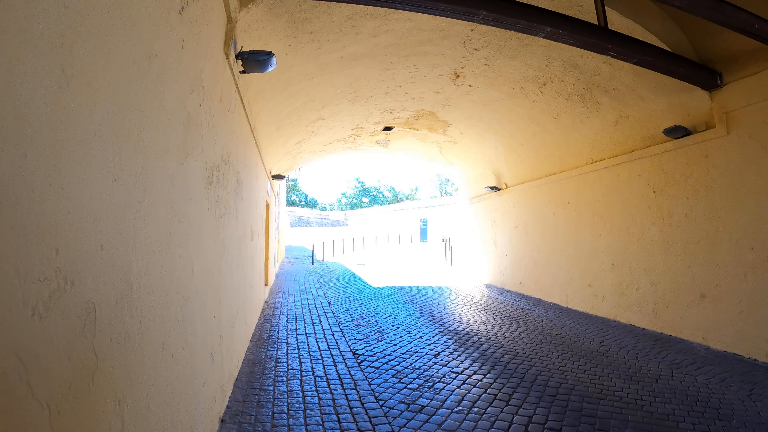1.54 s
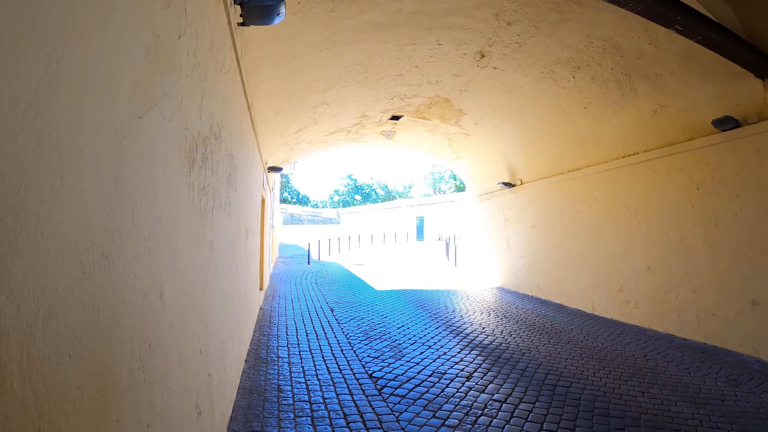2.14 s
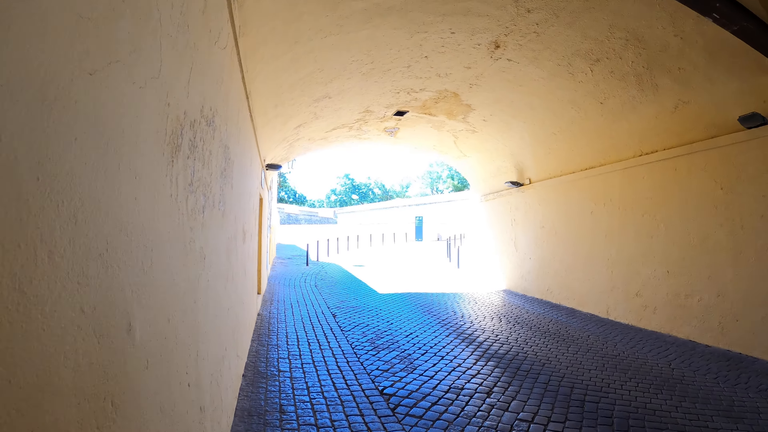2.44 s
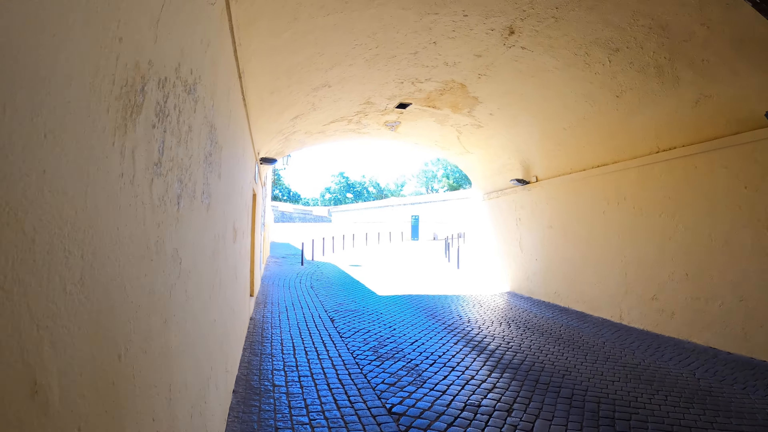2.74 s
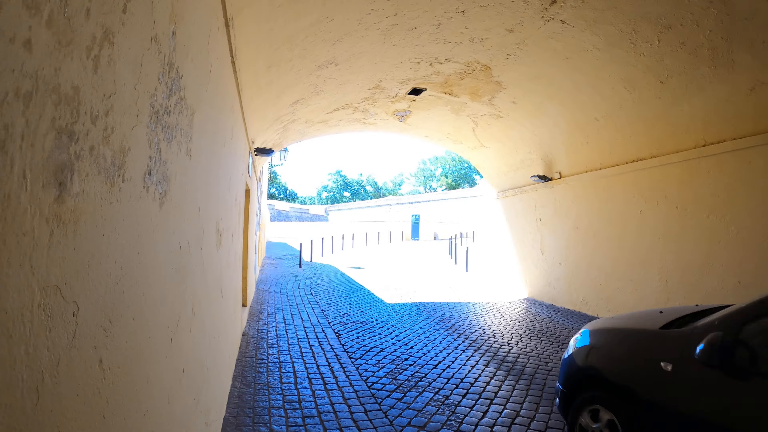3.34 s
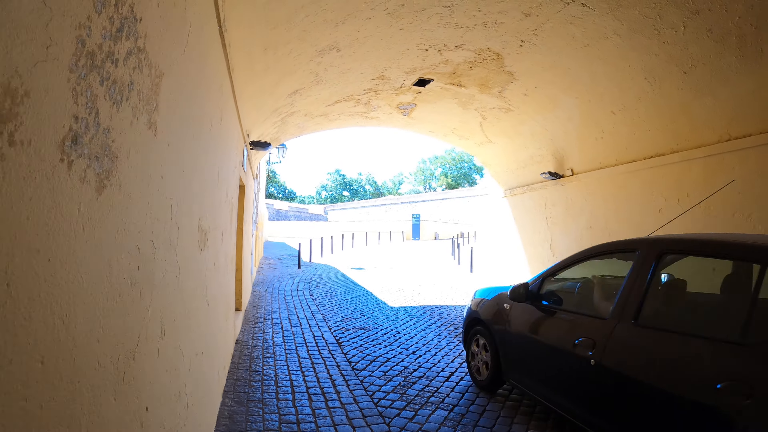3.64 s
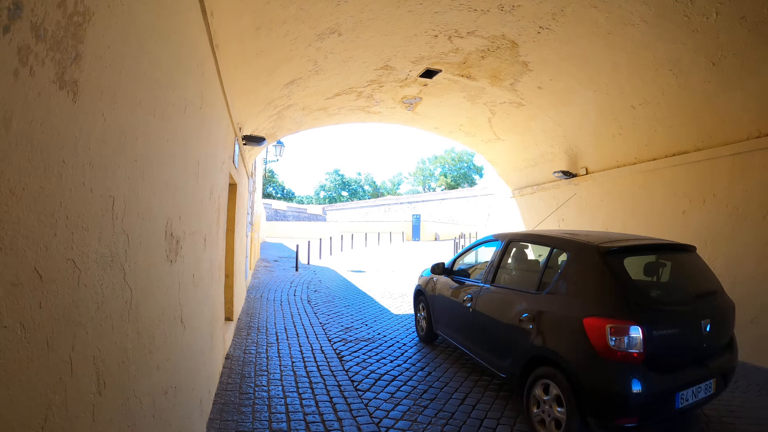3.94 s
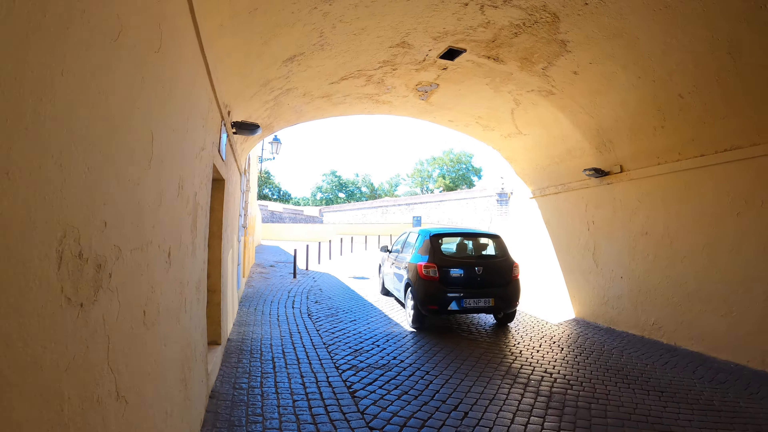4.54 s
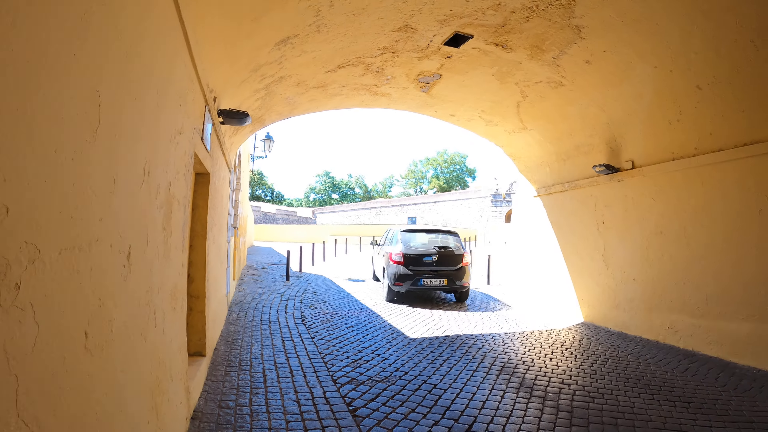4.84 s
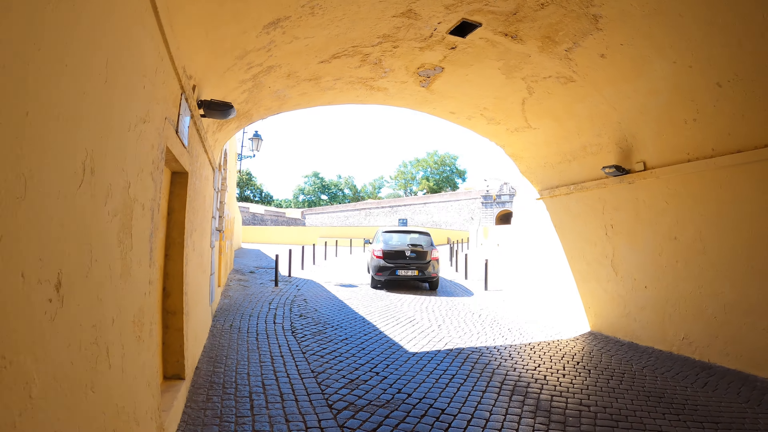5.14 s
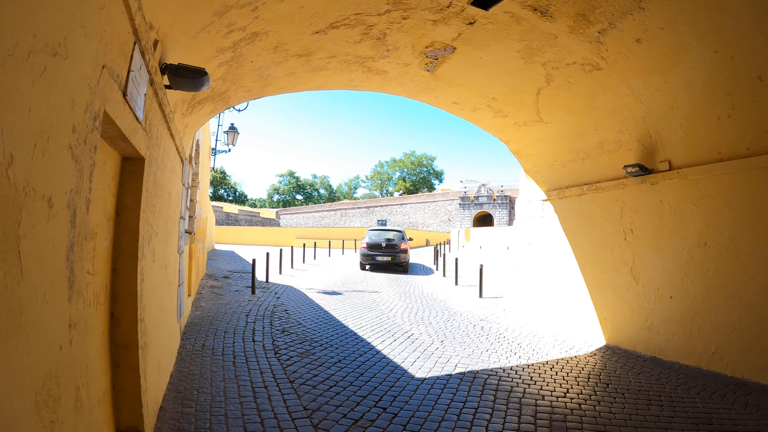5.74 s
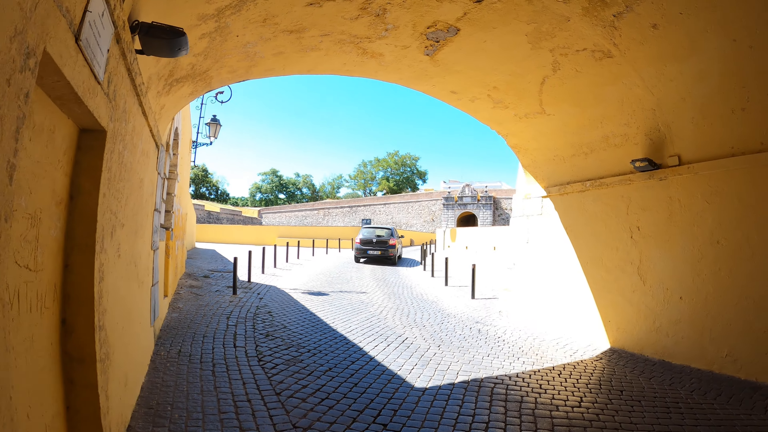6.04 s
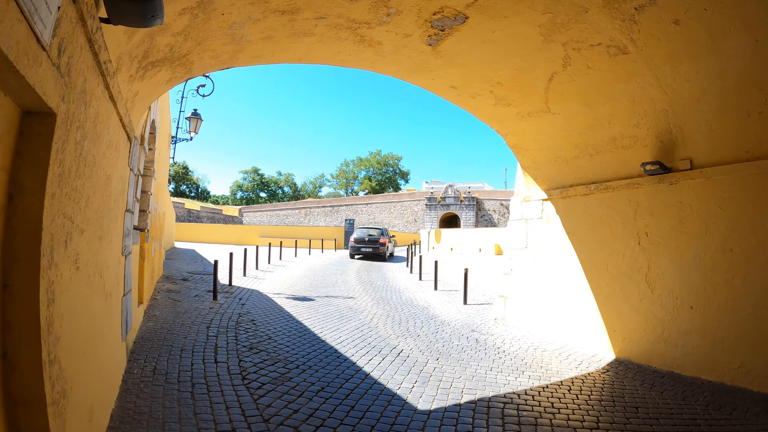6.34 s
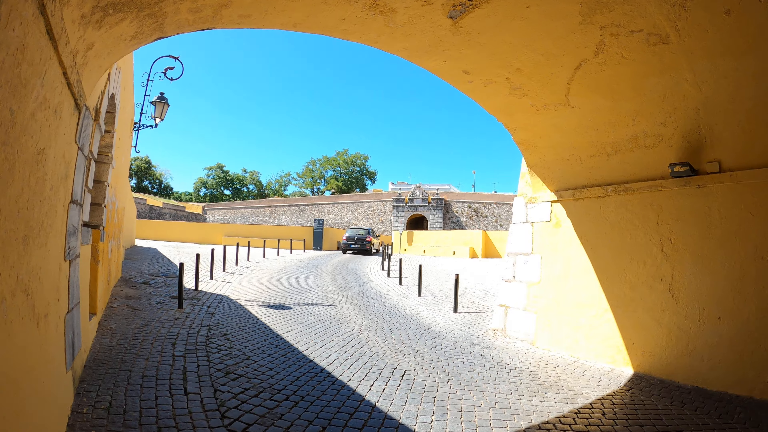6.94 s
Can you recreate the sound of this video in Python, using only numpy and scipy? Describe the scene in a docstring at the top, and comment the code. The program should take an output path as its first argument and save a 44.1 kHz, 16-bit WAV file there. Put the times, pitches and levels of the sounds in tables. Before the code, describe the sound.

A small car approaches inside a vaulted, cobbled gateway. Its exhaust throbs and drones from the start, with a dab of throttle just before 1 second, while the tyres patter and hiss over the stones, growing louder. Around 2 seconds a tyre squeals briefly, grit cracks under a nearby shoe, and a low draught starts buffeting the microphone. From 2 to about 5 seconds the car is at its loudest, passing on the right with dull knocks on raised stones and brief hums, and the vault booms deeply, most of all around 3.5 seconds. After 5 seconds the boom dies away and the tyre noise eases as the car reaches the open. The engine keeps pulling, slowly rising in pitch, with a hollow exhaust rush near 7 seconds. Close shoes crunch on grit around 5.6 seconds and again at 6.7, with a soft heel strike.

```python
"""In a vaulted, cobbled town gate, a small car comes from behind, passes on the right and pulls away.
Its tyres patter over the joints between the stones, knock on raised ones and squeal once.
Its three-cylinder engine drones through the exhaust, and the vault booms until the car is in the open.
Close by, a walker's shoes crunch on grit and a draught buffets the microphone."""
import sys
import numpy as np
from scipy import signal
from scipy.fft import rfft, irfft, next_fast_len
from scipy.io import wavfile
from scipy.ndimage import uniform_filter1d

SR = 44100
rng = np.random.default_rng(int(sys.argv[2]) if len(sys.argv) > 2 else 0)


def wrap_up_sound(samples):
    """Save the sound to the file named by the first command line argument, as 16-bit audio."""
    columns = np.atleast_2d(samples).T
    # keep every value between -1 and 1, then stretch to whole-number steps
    tamed = np.clip(columns, -1, 1)
    steps = np.round(tamed * 32767).astype(np.int16)
    wavfile.write(sys.argv[1], SR, steps)


N = 312669


def from_db(db):
    """Turn decibels into a number to multiply by."""
    return 10 ** (np.asarray(db) / 20)


def rms_one(x):
    """Scale a sound so that its average strength (rms) is 1."""
    return x / np.sqrt(np.mean(x ** 2) + 1e-20)


def in_time(rows):
    """Join a table's points with straight lines: one curve for each column after the time."""
    times, *columns = np.transpose(rows)
    return [np.interp(np.arange(N) / SR, times, column) for column in columns]


def at_hz(points, hz, beyond=None):
    """Look up a table by frequency, on a scale of octaves."""
    f, value = np.transpose(points)
    return np.interp(np.log(hz + 1e-3), np.log(f), value, beyond, beyond)


def drift(rate):
    """A random wobble, about 1 in size, that finds a new value `rate` times a second."""
    knots = rng.standard_normal(8000)
    return rms_one(np.interp(np.arange(N) / SR * rate, np.arange(len(knots)), knots))


def ramp(start_s, end_s):
    """Rise from 0 to 1 between two times."""
    return np.clip((np.arange(N) / SR - start_s) / (end_s - start_s), 0, 1)


def swell(at_s, lasts_s):
    """A smooth bump of height 1."""
    return np.exp(-((np.arange(N) / SR - at_s) / lasts_s) ** 2)


def pan(db):
    """Gains for the two ears, with the left `db` louder than the right."""
    return from_db(np.array([[.5], [-.5]]) * db)


# How much louder the left ear is: f/Hz, left-right/dB
EAR_BALANCE = [(150, 0), (400, 0), (650, 1.4), (1600, 2), (2600, 4), (4200, 1.5), (7000, -1)]
# How wide each frequency sounds (side against middle): f/Hz, width/dB
STEREO_WIDTH = [(60, -33), (150, -46), (250, -20.5), (500, -16.5), (1000, -10.5), (2000, -8.5), (4000, -5),
                (8000, 0)]
# The car's path: t/s, share out of the gate/0-1, extra width/dB
CAR_PATH = [(0, 0.09, -7), (1.8, 0, -0.5), (2.8, 0.19, 1.5), (3.6, 0.14, 2), (4.7, 0.14, 0.5),
            (5.05, 1, -0.5), (7.09, 0.94, 0)]
def stereo_noise(spectrum):
    """Noise of a given colour, alike in both ears in the bass, widest while the car is alongside."""
    size = next_fast_len(N, real=True)
    hz = np.arange(size // 2 + 1) * SR / size
    mid, side = rfft(rng.standard_normal((2, size))) * from_db(at_hz(spectrum, hz, -120))
    centre = irfft(mid * pan(at_hz(EAR_BALANCE, hz)), size)[:, :N]
    wide = irfft(side * from_db(at_hz(STEREO_WIDTH, hz)), size)[:N] * from_db(in_time(CAR_PATH)[1])
    return (centre + wide * [[1], [-1]]) / np.std(centre.mean(axis=0))


def narrow_noise(hz, width_hz, wander):
    """A narrow band of noise that sounds like a wavering note."""
    phase = 2 * np.pi * np.cumsum(hz * (1 + wander * drift(6))) / SR
    band = drift(width_hz) * np.cos(phase) + drift(width_hz) * np.sin(phase)
    return band * pan(at_hz(EAR_BALANCE, hz))


def bursts(rows, decay_s):
    """Each time two things touch, they make a dying burst of noise around one pitch."""
    out = np.zeros((2, N + SR))
    t = np.arange(SR // 4) / SR
    shape = np.exp(-t / decay_s) * np.minimum(t / .0005, 1) + 1e-18
    for start_s, db, hz, octaves, pan_db in rows:
        mid, side = rng.standard_normal((2, len(t))) * shape
        noise = mid + side * [[1], [-1]] * from_db(at_hz(STEREO_WIDTH, hz))
        edges_hz = [hz * 2 ** (-octaves / 2), min(hz * 2 ** (octaves / 2), .45 * SR)]
        band = signal.butter(2, edges_hz, "band", fs=SR, output="sos")
        burst = rms_one(signal.sosfilt(band, noise)) * np.sqrt(np.mean(shape ** 2))
        at = int(start_s * SR)
        out[:, at:at + len(t)] += from_db(db) * pan(pan_db) * burst
    return out[:, :N]


def patter(knocks, decay_s, smooth_share):
    """A loudness curve: soft rubber rounds off each knock, and walls smear a share into a steady wash."""
    energy = signal.lfilter([1], [1, -np.exp(-2 / (decay_s * SR))], knocks ** 2 + 1e-18)
    energy = uniform_filter1d(uniform_filter1d(energy, size=48), size=48)
    return np.sqrt(smooth_share + (1 - smooth_share) * energy / energy.mean())


def microphone_hiss(level_db):
    """The microphone adds a faint, even hiss of its own."""
    return from_db(level_db) * rng.standard_normal((2, N))


# The low rumble of moving air: f/Hz, level/dB
WIND_COLOUR = [(12, -9), (30, 0), (60, -3), (100, -10), (180, -23), (400, -50)]
def draught(still_db, walking_db, gust_db):
    """Swirls of air buffet each side of the microphone separately, harder once the walk begins."""
    hz = np.arange(N // 2 + 1) * SR / N
    swirls = irfft(rfft(rng.standard_normal((2, N))) * from_db(at_hz(WIND_COLOUR, hz, -120)), N)
    puff_db = 3 * swell(at_s=6.8, lasts_s=.096)
    level_db = still_db + (walking_db - still_db) * ramp(1.8, 3.6) + puff_db
    return from_db(level_db) * rms_one(from_db(gust_db * drift(9)) * swirls)


def vault_echo(x, cutoff_hz, fade_s=.6):
    """Plastered walls send back a dense, dull echo that falls 60 dB in `fade_s`."""
    t = np.arange(SR) / SR
    tail = rng.standard_normal((2, SR)) * from_db(-60 * t / fade_s) * np.minimum(t / .017, 1)
    tail = signal.sosfilt(signal.butter(2, cutoff_hz, fs=SR, output="sos"), tail)
    return signal.fftconvolve(x, rms_one(tail) / np.sqrt(SR), axes=1)[:, :N]


# Grit cracks, soles scuff, a heel lands. All three: t/s, level/dB, f/Hz, band/octaves, left-right/dB
GRIT_CRACKS = [(2.189, -26.5, 3100, .9, 2), (3.195, -46, 5800, .75, 0), (5.6041, -24.5, 3000, .55, 3),
               (5.746, -54, 7600, .8, 0), (5.931, -53, 8600, .4, 0), (6.0045, -43.5, 6200, .7, 0),
               (6.727, -24.5, 3200, .8, 3), (6.7325, -36, 4100, 1.1, 1), (6.7442, -29, 3900, 1.1, -1),
               (6.7488, -32, 3500, 1, 2), (6.758, -36, 5100, 0.45, 1), (6.774, -32, 2100, .5, 0),
               (6.792, -42, 4000, .8, 0)]
SOLE_SCUFFS = [(.005, -55.5, 4170, 0.76, 0), (3.425, -50, 5600, 0.7, 0), (6.745, -54, 4500, .9, 0)]
HEEL_STRIKE = [(6.79, -27, 600, 1.5, 0), (6.793, -23, 265, .6, 0)]
def footsteps(echo_db):
    """The soles are soft, so you mostly hear grains cracking and scraping between shoe and stone."""
    steps = bursts(GRIT_CRACKS, decay_s=.0021)
    steps += bursts(SOLE_SCUFFS, decay_s=.033)
    steps += bursts(HEEL_STRIKE, decay_s=.0066)
    return steps + from_db(echo_db) * vault_echo(steps, cutoff_hz=9000)


# The crunch of grit under a shoe: f/Hz, level/dB
CRUNCH_COLOUR = [(1800, -3), (2800, 3), (3800, 1.5), (5000, -10.5), (7000, -15), (10000, -27.5),
                 (14000, -39)]
def sole_grinding(level_db, grains_per_s, spread_db):
    """A sole rolls over loose grit and crushes a run of tiny grains."""
    crushed = rng.random(N) < grains_per_s / SR
    grains = crushed * from_db(spread_db * np.clip(rng.standard_normal(N), -2, 2))
    crunch = stereo_noise(CRUNCH_COLOUR) * patter(grains, decay_s=.003, smooth_share=.4)
    return from_db(level_db) * swell(at_s=5.82, lasts_s=.39) * crunch


# The vault's deep note: f/Hz, level/dB
BOOM_COLOUR = [(15, -28), (24, -11), (29, -5), (33, 3), (37, -7), (44, -10), (52, -21), (110, -50)]
# Its loudness, greatest while the car is just ahead: t/s, level/dB
BOOM_LEVEL = [(0, -42.5), (1.05, -35), (1.15, -25.5), (1.35, -38), (1.65, -33), (2, -25), (2.15, -28),
              (2.38, -29), (2.47, -21), (2.72, -25), (2.85, -20), (3.02, -19), (3.11, -35), (3.2, -21.5),
              (3.57, -15.5), (3.85, -21), (4.12, -21.5), (4.4, -26), (4.82, -24), (5.3, -41), (7.09, -39)]
def vault_boom():
    """The vault's lowest resonance heaves as the car goes through and dies away as it leaves."""
    boom = stereo_noise(BOOM_COLOUR)
    loudness = np.abs(signal.hilbert(boom.mean(axis=0), next_fast_len(N)))[:N]
    evened = boom / np.hypot(loudness, .5)
    return from_db(in_time(BOOM_LEVEL)[0]) * rms_one(evened)


# Brief booms, hums and rings: t/s, length/s, f/Hz, band/Hz, level/dB
NARROW_SWELLS = [(.8, .22, 800, 45, -47), (.95, .25, 470, 90, -46), (1.28, .15, 330, 80, -43),
                 (2.12, .09, 880, 150, -36), (2.15, .08, 172, 30, -30), (2.34, .04, 940, 180, -37),
                 (2.5, .05, 172, 20, -29), (2.88, .09, 146, 20, -32), (2.92, .14, 83, 8, -29),
                 (3.33, .15, 600, 170, -36), (3.5, .15, 40, 4, -22), (4.12, .05, 970, 190, -35),
                 (4.58, .045, 1010, 180, -31.5), (4.72, .07, 1050, 280, -30.5), (4.8, .14, 43, 4, -20),
                 (4.92, .08, 190, 15, -32), (5.2, .09, 1075, 130, -35.5), (5.73, .09, 950, 150, -37)]
def narrow_swells():
    """Brief booms, hums and rings swell and fade in narrow bands as the car passes."""
    out = np.zeros((2, N))
    for at_s, lasts_s, hz, width_hz, db in NARROW_SWELLS:
        bump = swell(at_s, lasts_s)
        band = narrow_noise(hz, width_hz, wander=.01)
        band_rms = np.sqrt(np.average(band.mean(axis=0) ** 2, weights=bump ** 2))
        out += from_db(db) * bump * band / band_rms
    return out


def bonnet_whistle(start_s, end_s, low_hz, high_hz, level_db):
    """A faint, airy whistle from under the bonnet climbs as the car goes by."""
    peak = ((start_s + end_s) / 2, (low_hz + high_hz) / 2, 1)
    hz, power = in_time([(start_s, low_hz, 0), peak, (end_s, high_hz, 0)])
    phase = 2 * np.pi * np.cumsum(hz * (1 + .006 * drift(40))) / SR
    return from_db(level_db) * np.sqrt(power) * drift(500) * np.sin(phase)


# Gas rushing through the muffler: t/s, level/dB
RUSH_LEVEL = [(0, -45), (1.5, -41), (6.0, -48.5), (6.35, -41), (6.7, -41), (6.85, -36), (7.09, -33.5)]
def muffler_rush(hz, width_hz):
    """A hollow rush of gas at the muffler's resonance, loudest as the car pulls away."""
    band = signal.butter(2, [hz - width_hz / 2, hz + width_hz / 2], "band", fs=SR, output="sos")
    return from_db(in_time(RUSH_LEVEL)[0]) * rms_one(signal.sosfilt(band, rng.standard_normal(N)))


# A dab of throttle, then a steady pull: t/s, firing rate/Hz
ENGINE_SPEED = [(0.25, 32), (0.62, 36.9), (0.82, 36.5), (1.3, 31.6), (1.75, 32.3), (2.4, 34.8),
                (2.78, 35.8), (3.02, 37.6), (3.2, 37.8), (3.45, 40.2), (4.0, 43), (4.6, 46.5), (5.4, 48.8),
                (6.0, 49.9), (6.35, 50.9), (6.6, 53.2), (7.09, 55.2)]
def firing_rate():
    """How many times a second the engine fires, moment by moment."""
    return in_time(ENGINE_SPEED)[0]


# The throb at the firing rate and the drone of the overtones above it. Both: t/s, level/dB
THROB_LEVEL = [(0, -34), (.6, -31), (.83, -23), (1.03, -34), (1.6, -32), (2.5, -24), (3.1, -30), (3.8, -27),
               (4.1, -22), (4.35, -29), (5.1, -20), (5.19, -27), (5.27, -18), (5.37, -34), (5.45, -20.5),
               (5.57, -26), (5.7, -20.5), (5.82, -20.5), (6.13, -16.5), (6.28, -25), (6.36, -22.5),
               (6.54, -28), (6.72, -23), (6.98, -33), (7.09, -24)]
DRONE_LEVEL = [(0, -49), (.4, -31), (.58, -30), (.85, -24), (1.02, -25.5), (1.15, -35), (1.65, -32),
               (1.9, -23.5), (2.3, -20.5), (2.55, -18), (2.7, -19), (2.8, -22), (2.92, -18.5), (3.35, -25),
               (3.8, -30), (4.0, -21), (4.35, -31), (4.7, -23.5), (5.0, -19.5), (5.28, -20.5), (5.5, -38),
               (5.62, -30), (5.7, -35), (5.95, -25.5), (6.2, -26.5), (6.45, -34), (6.75, -25), (7.0, -34)]
# The overtones, as multiples of the firing rate, and the strength of each: level/dB
OVERTONES = [2, 5 / 2, 3, 4, 5]
OVERTONE_DB = [0.5, -11, 0, -2, -6.5]
# Pitches that muffler and vault favour or weaken: f/Hz, level/dB
RESONANCES = [(62, -12), (69, -8), (76, -11), (86, -0.5), (97, 1.5), (107, -0.5), (120, -6), (132, -23),
              (178, -16), (210, -18.5), (250, -17.5), (330, -24)]
def exhaust(firing_hz, drone_rough, throb_rough):
    """The firings throb; their overtones swell and fade as they cross the resonances."""
    phase = 2 * np.pi * np.cumsum(firing_hz) / SR
    throb = from_db(in_time(THROB_LEVEL)[0]) * np.cos(phase + throb_rough * drift(16))
    throb *= 1 + throb_rough * drift(20)
    drone_db = in_time(DRONE_LEVEL)[0]
    drone = np.zeros(N)
    for multiple, db in zip(OVERTONES, OVERTONE_DB):
        gain = from_db(drone_db + db + at_hz(RESONANCES, multiple * firing_hz))
        tone = np.cos(multiple * phase + drone_rough * drift(13))
        drone += gain * tone * (1 + drone_rough * drift(18))
    return throb + drone


# One short squeal: t/s, f/Hz, level/dB
SQUEAL_NOTE = [(1.87, 1790, -100), (1.885, 1800, -38.5), (1.92, 1860, -34), (1.95, 1920, -45),
               (2.02, 1890, -40), (2.06, 1880, -56), (2.1, 1880, -100)]
def tyre_squeal(wander):
    """Rubber slips on polished stone: a shaky note that slides up and fades."""
    hz, db = in_time(SQUEAL_NOTE)
    phase = 2 * np.pi * np.cumsum(hz * (1 + wander * drift(300))) / SR
    return from_db(db) * (1 + drift(120) / 2) * np.sin(phase) * pan(at_hz(EAR_BALANCE, hz))


# Stones that stick up: t/s, level/dB, f/Hz, band/octaves, left-right/dB
RAISED_STONES = [(2.108, -22.5, 180, .8, 0), (2.497, -23.5, 170, .8, 0), (2.648, -24.5, 160, .8, 0),
                 (2.812, -24.5, 160, .8, 0), (2.893, -22.5, 155, .8, 0), (3.768, -21.5, 185, .9, 0),
                 (3.878, -26, 1100, 1.2, 1), (3.93, -24, 380, .6, 0), (4.12, -24, 185, .9, 0),
                 (4.395, -22.5, 200, 1.1, 0), (5.356, -23.5, 960, .35, 1), (5.366, -26, 380, .7, 0)]
def wheel_knocks():
    """A wheel gives a short knock when it hits a raised stone."""
    return bursts(RAISED_STONES, decay_s=.008)


# Echoes from the nearby walls and ceiling: delay/s, level/dB
WALL_ECHOES = [(.004, -30.5), (.0065, -22), (.0087, -17.5), (0.0131, -37)]
def near_walls(x, path_change):
    """Quick echoes colour the sound; their paths change as the car and the listener move."""
    samples = np.arange(N)
    out, power = x.copy(), 1
    for delay_s, db in WALL_ECHOES:
        earlier = samples - delay_s * SR * (1 + path_change * drift(.8))
        out += from_db(db) * np.array([np.interp(earlier, samples, ear) for ear in x])
        power += from_db(db) ** 2
    return out / np.sqrt(power)


def stone_joints(stones_per_s, uneven, spread_db):
    """Four wheels each drop into one joint after another; the stones differ in length and height."""
    stones_passed = np.cumsum(stones_per_s) / SR
    knocks = np.zeros(N)
    for wheel in rng.standard_normal((4, 800, 2)):
        lengths = np.exp(uneven * wheel[:, 0])
        at = np.searchsorted(stones_passed, np.cumsum(lengths))
        knocks[at[at < N]] += from_db(spread_db * np.minimum(wheel[at < N, 1], 2))
    return knocks


# Colours of the tyre's body, its tread (in and out of the gate) and the grit. All: f/Hz, level/dB
BODY_THUD = [(35, -29), (60, 5), (82, 0), (125, -1), (175, -4), (215, -10), (255, -9), (330, -16),
             (400, -16), (520, -36)]
TREAD_INSIDE = [(280, -47), (390, -0.5), (480, 3.5), (580, 1), (700, 2), (820, 2), (960, 2), (1150, -1),
                (1400, -6.5), (1750, -33)]
TREAD_OUTSIDE = [(280, -1.5), (390, -2.5), (470, -2), (570, -3), (720, -3), (840, -3), (950, 2), (1090, -3),
                 (1230, -2.5), (1400, -12.5), (1750, -18)]
GRIT_HISS = [(1100, -7.5), (1450, 1.5), (1700, -0.5), (1950, 0.5), (2400, -5), (2750, -5.5), (3200, -9.5),
             (3750, -9.5), (4400, -16), (5500, -27.5)]
GRIT_SIZZLE = [(3800, -4), (4900, -2), (5500, 1.5), (6200, -1), (7200, -3), (8100, -9.5), (9300, -8.5),
               (10300, -15.5), (12500, -23), (15000, -32)]
# The tyres come near, pass and leave: t/s, roar level/dB, thud level/dB
TYRE_LEVELS = [(0.25, -46, -35), (.9, -40.5, -31.5), (1.6, -36, -27.5), (2.12, -32, -23), (3, -32.5, -28),
               (3.35, -31, -26.5), (4.42, -30.5, -26), (4.58, -29.5, -24), (4.8, -29, -25),
               (5.15, -33, -29.5), (6.3, -35.5, -29.5), (7.09, -37, -29)]
# The tread's ring climbs as the car gathers speed: t/s, f/Hz, level against the roar/dB
RING_NOTE = [(.8, 788, -29), (2.2, 895, -10), (3.8, 991, -10), (4.7, 1055, -14), (5.4, 1025, -12.5),
             (7.09, 1001, -7)]
def tyres(firing_hz, stones_per_firing, left_lag_s):
    """Rolling over the joints thumps the tyre's body, slaps its tread and crushes grit."""
    knocks = stone_joints(stones_per_firing * firing_hz, uneven=.2, spread_db=2.5)
    outside = in_time(CAR_PATH)[0]
    roar_db, thud_db = in_time(TYRE_LEVELS)
    hiss_db = -11.5 + .84 * roar_db - 4 * outside  # follows the roar, softer in the open
    ring_hz, ring_db = in_time(RING_NOTE)
    tread = np.sqrt(1 - outside) * stereo_noise(TREAD_INSIDE)
    tread += np.sqrt(outside) * stereo_noise(TREAD_OUTSIDE)
    tread += from_db(ring_db) * narrow_noise(ring_hz, width_hz=150, wander=.035)
    grit = stereo_noise(GRIT_HISS) + from_db(-18.5 - 2.3 * outside) * stereo_noise(GRIT_SIZZLE)
    thud = from_db(thud_db) * stereo_noise(BODY_THUD) * patter(knocks, decay_s=.012, smooth_share=.8)
    roar = from_db(roar_db) * tread * patter(knocks, decay_s=.0064, smooth_share=.76)
    hiss = from_db(hiss_db) * grit * patter(knocks, decay_s=.0093, smooth_share=.59)
    left, right = near_walls(thud + roar + hiss, path_change=.0582)
    # the car is on the right, so its sound reaches the left ear later
    return np.array([np.roll(left, round(left_lag_s * SR)), right])


def scene():
    """Add up the car, the walker, the vault and the background."""
    firing_hz = firing_rate()
    car = tyres(firing_hz, stones_per_firing=1.5, left_lag_s=2.8e-5)
    swells = narrow_swells()
    car += wheel_knocks() + tyre_squeal(wander=.023)
    car += exhaust(firing_hz, drone_rough=.1, throb_rough=.16) + muffler_rush(hz=283.5, width_hz=92)
    car += bonnet_whistle(start_s=3.3, end_s=4.1, low_hz=10200, high_hz=12950, level_db=-76)
    walker = footsteps(echo_db=-8) + sole_grinding(level_db=-52, grains_per_s=150, spread_db=3)
    hiss = microphone_hiss(level_db=-83)
    return car + swells + walker + vault_boom() + draught(still_db=-55, walking_db=-38, gust_db=3) + hiss


def record(dry):
    """Fade in quickly and cut the highest treble."""
    treble_cut = signal.cheby2(12, 70, 15500, fs=SR, output="sos")
    return signal.sosfilt(treble_cut, dry * ramp(0, .003))


dry = scene()
out = record(dry)
wrap_up_sound(out)
```